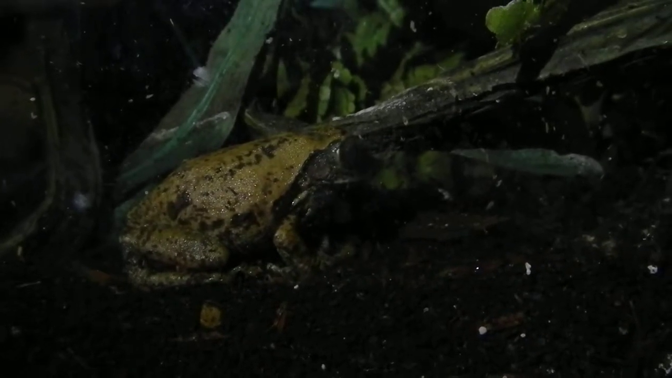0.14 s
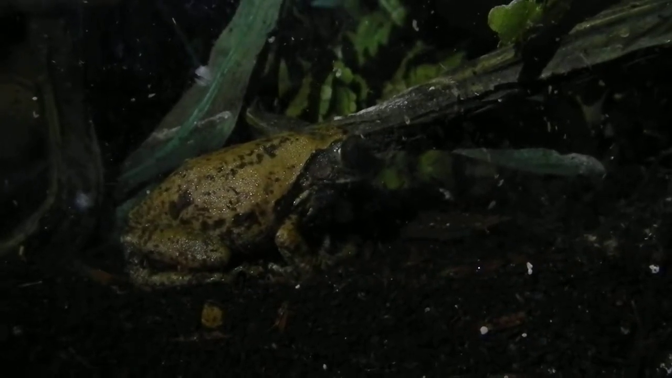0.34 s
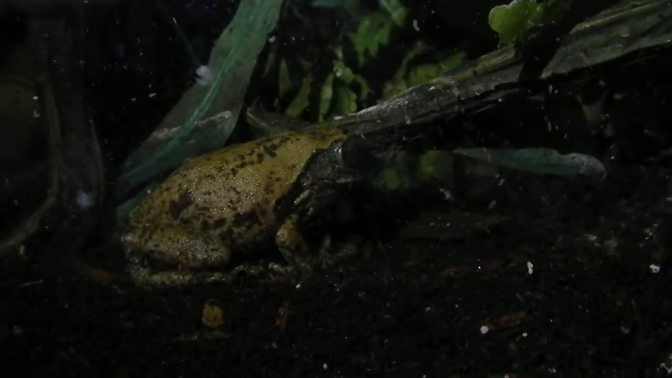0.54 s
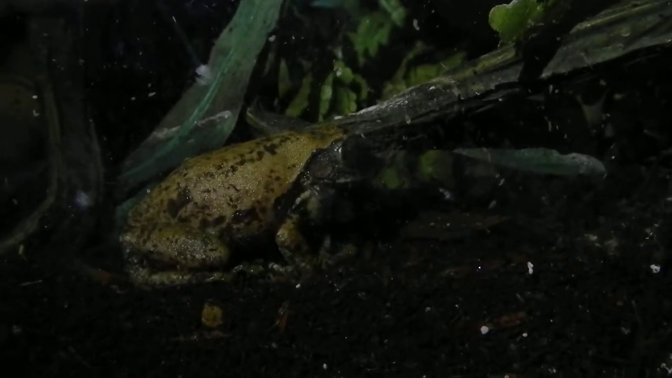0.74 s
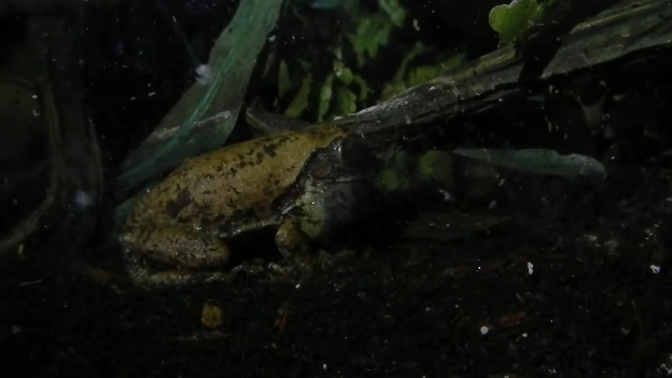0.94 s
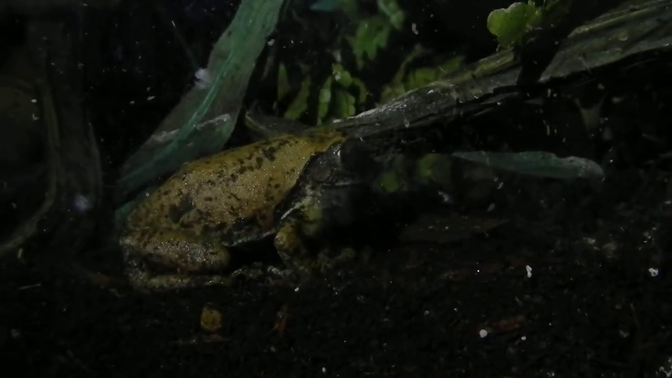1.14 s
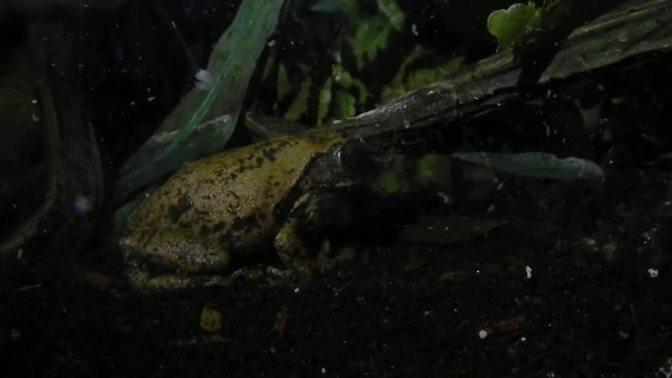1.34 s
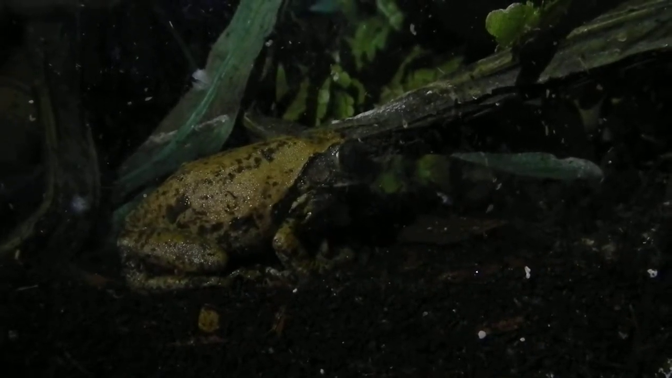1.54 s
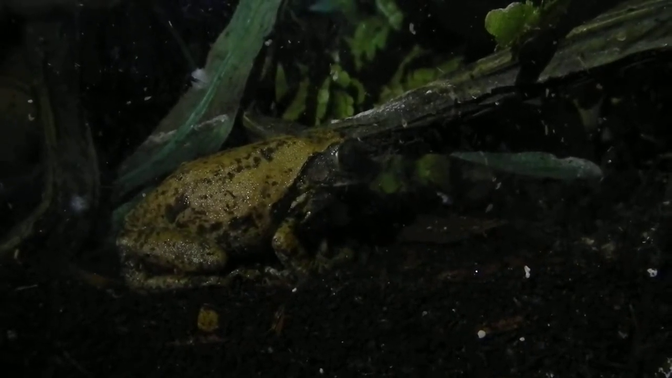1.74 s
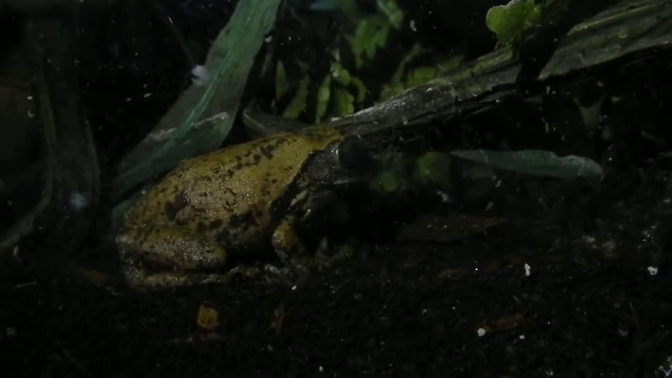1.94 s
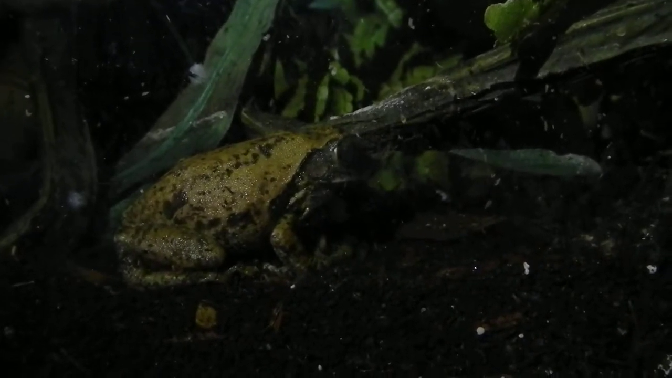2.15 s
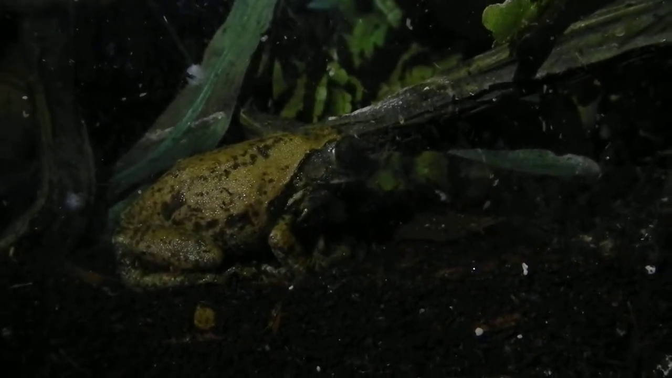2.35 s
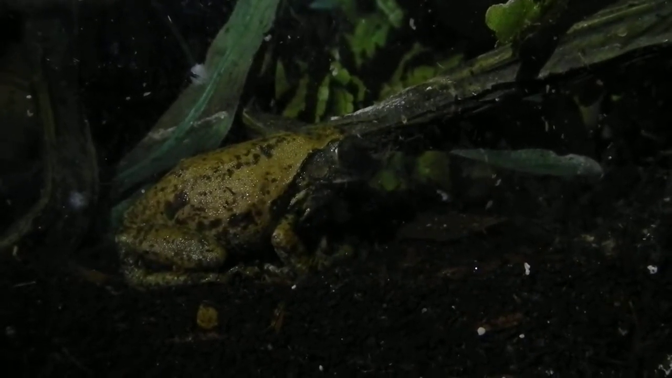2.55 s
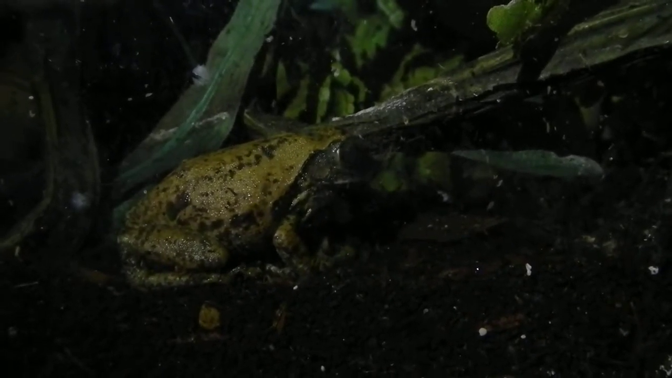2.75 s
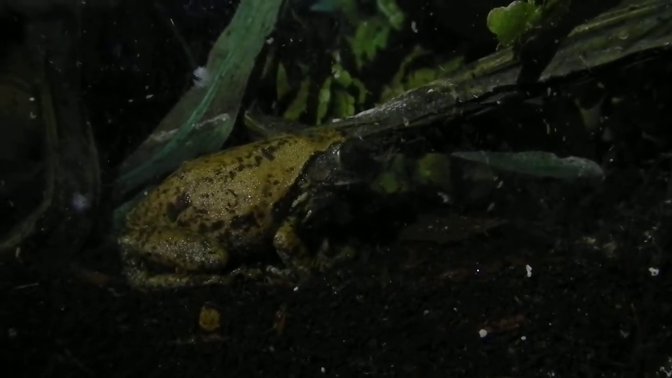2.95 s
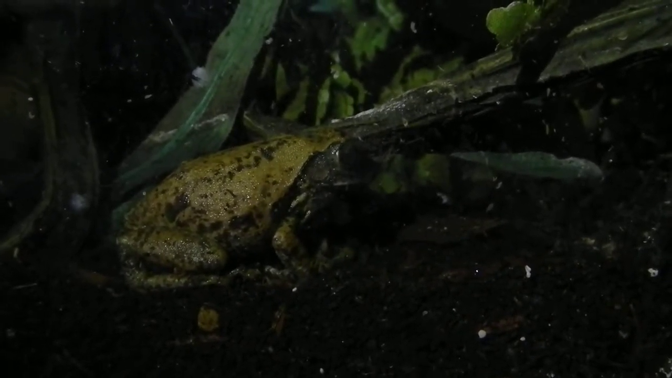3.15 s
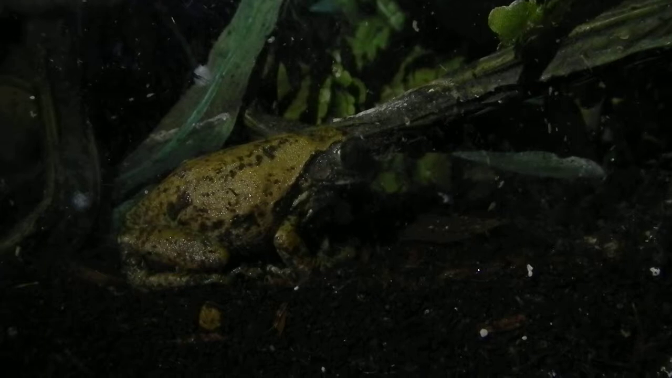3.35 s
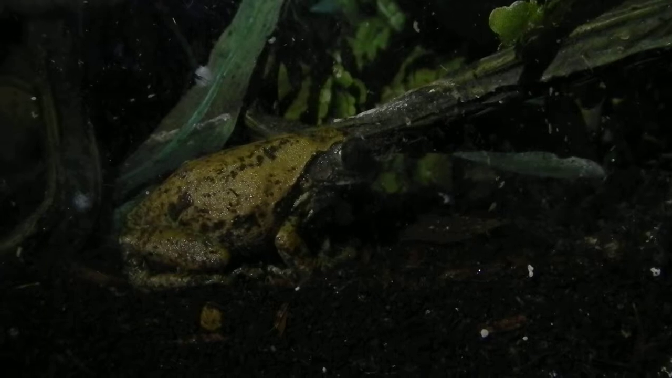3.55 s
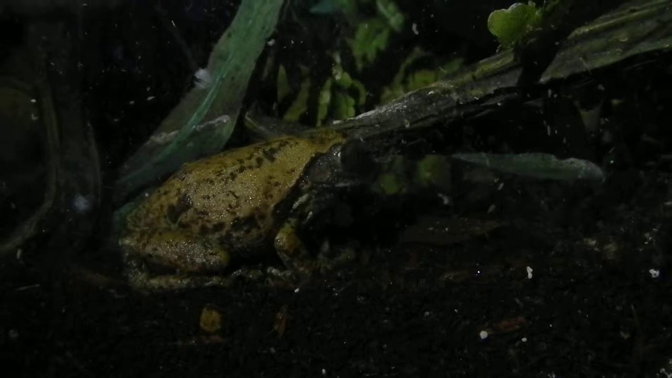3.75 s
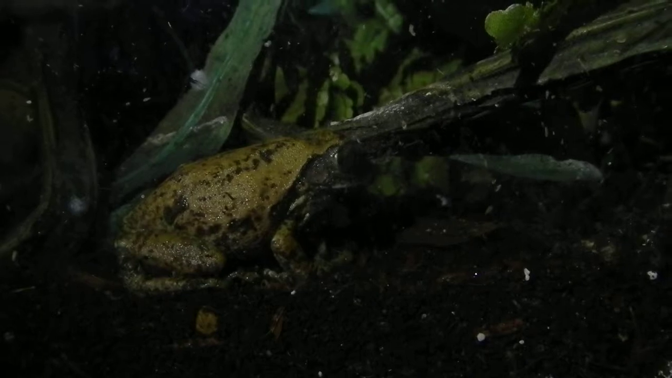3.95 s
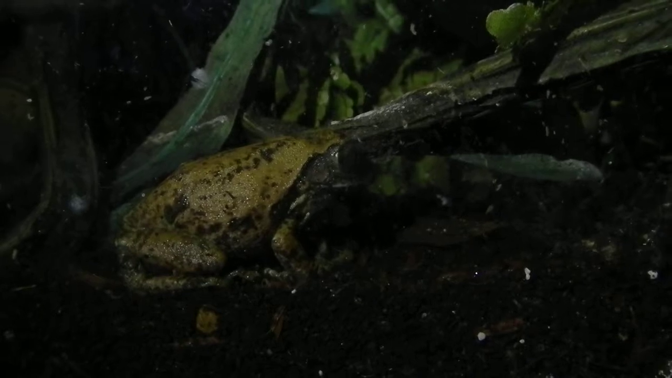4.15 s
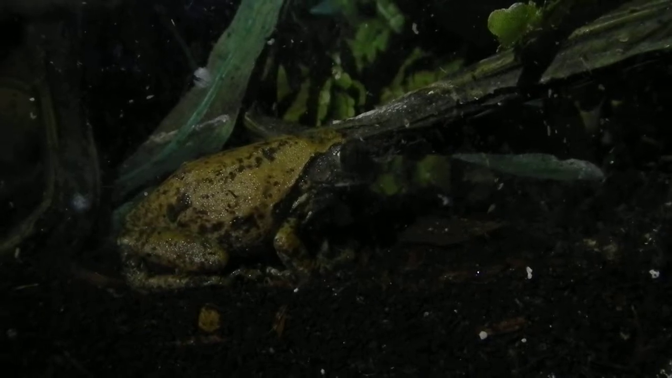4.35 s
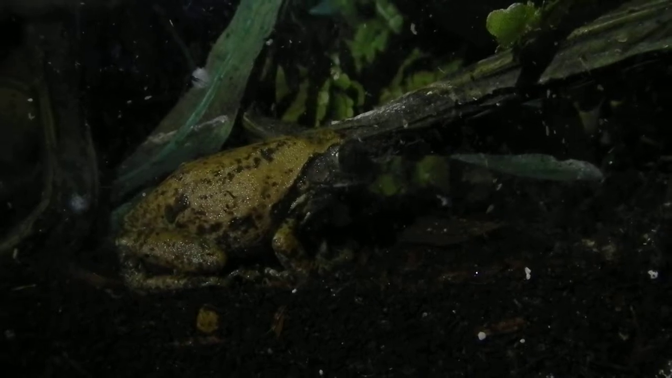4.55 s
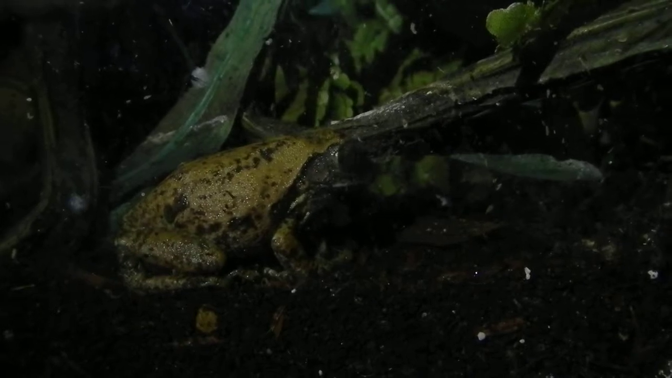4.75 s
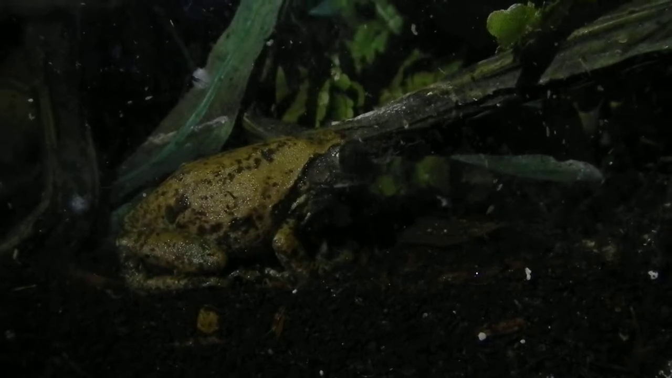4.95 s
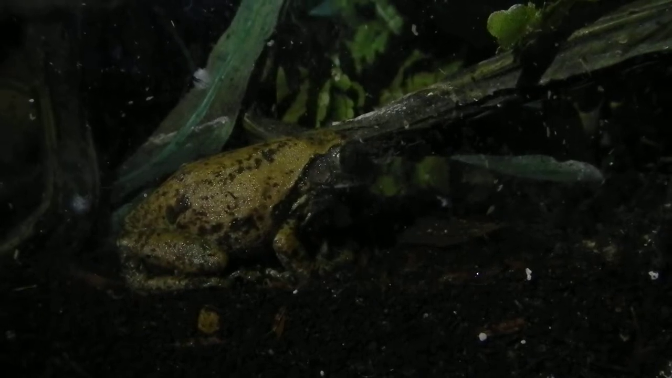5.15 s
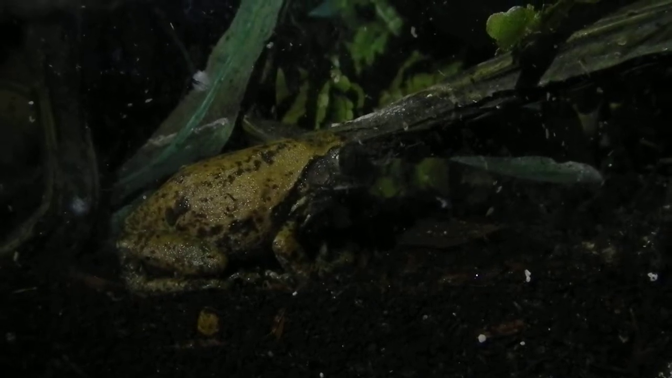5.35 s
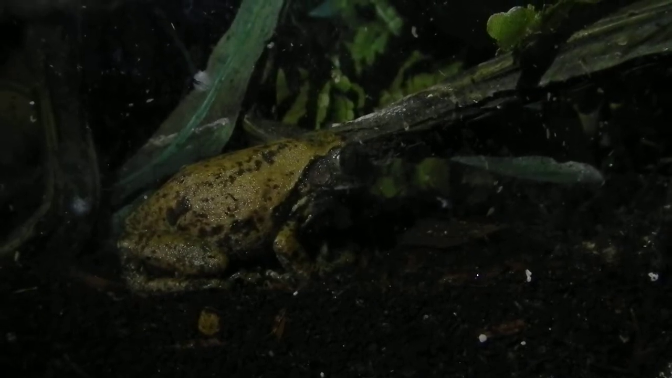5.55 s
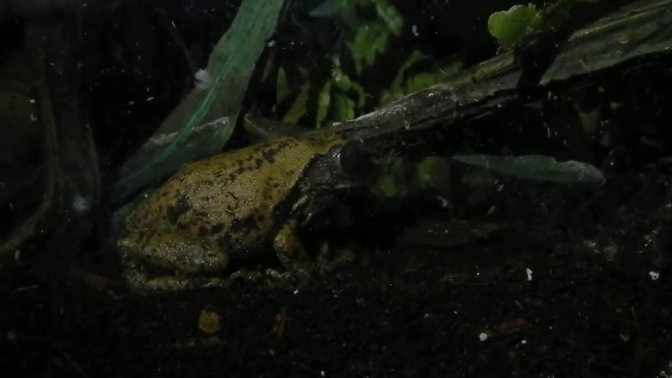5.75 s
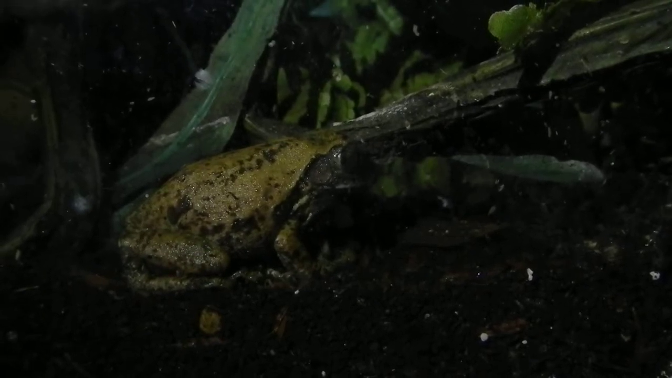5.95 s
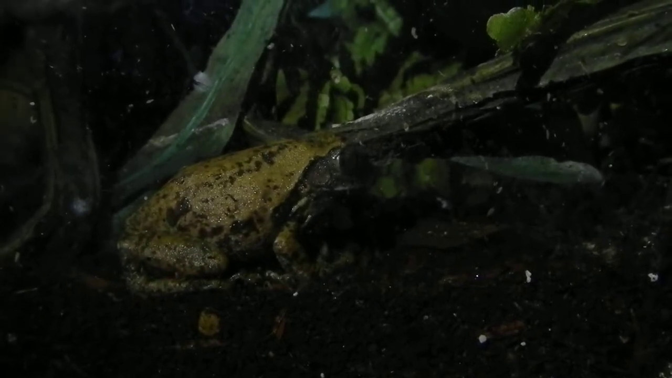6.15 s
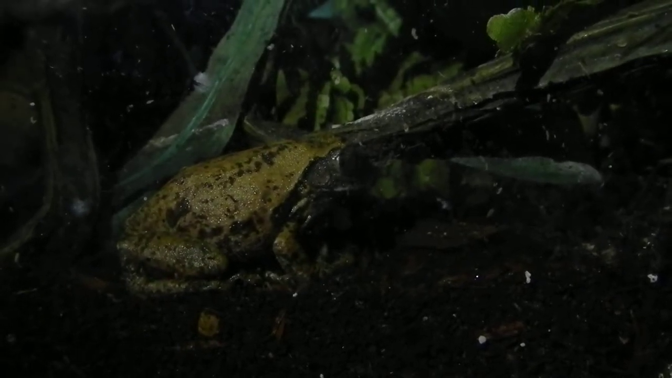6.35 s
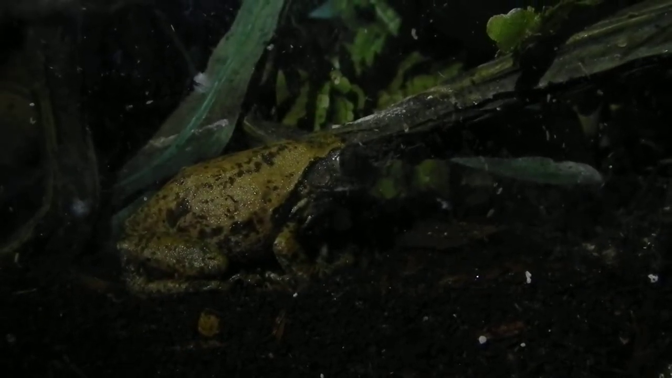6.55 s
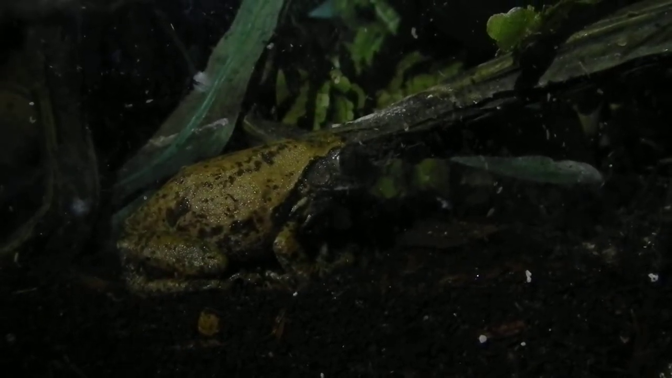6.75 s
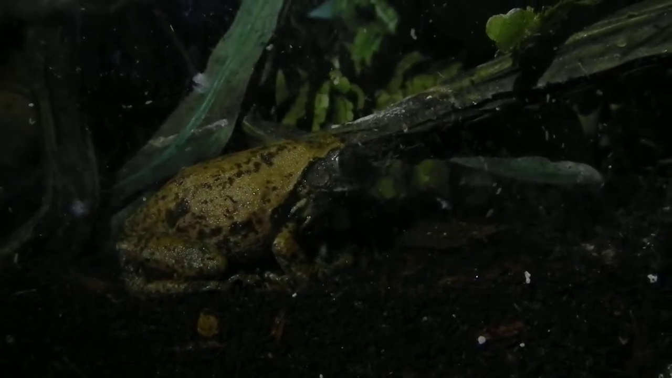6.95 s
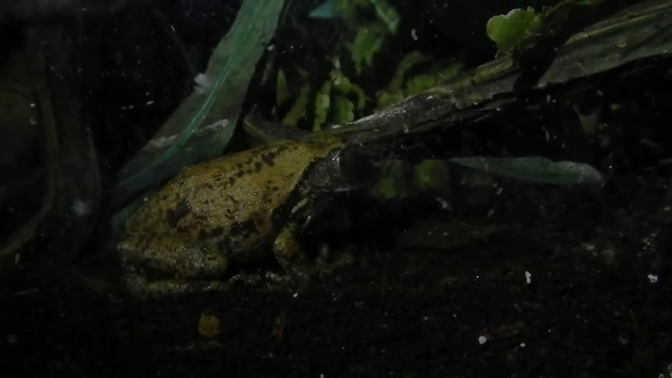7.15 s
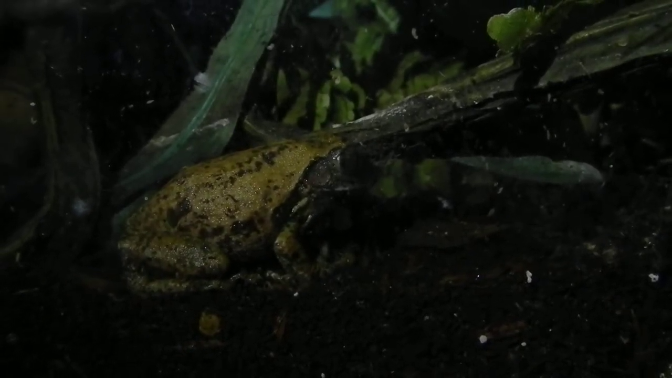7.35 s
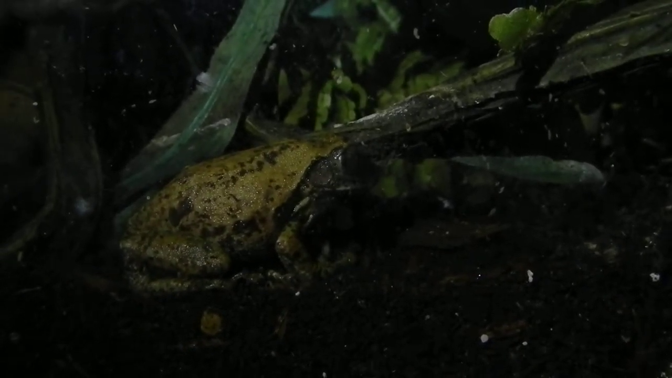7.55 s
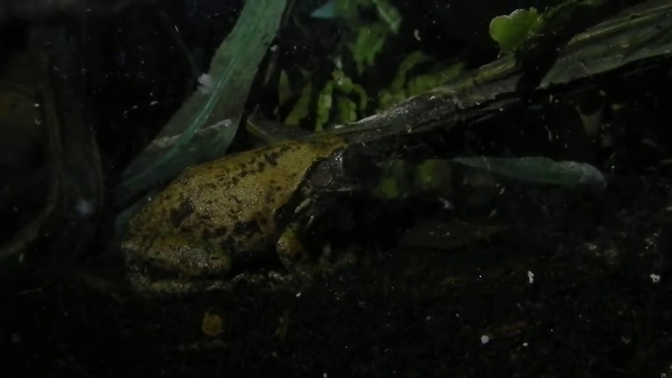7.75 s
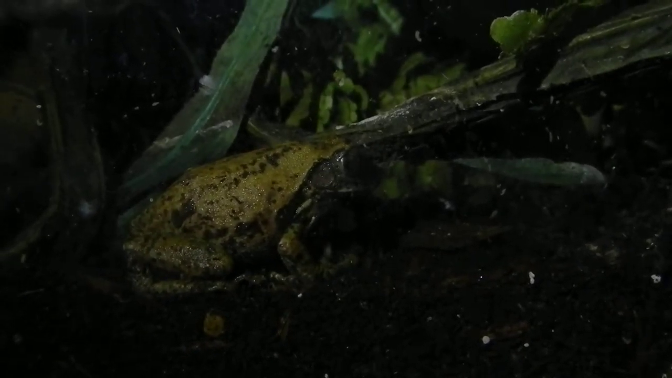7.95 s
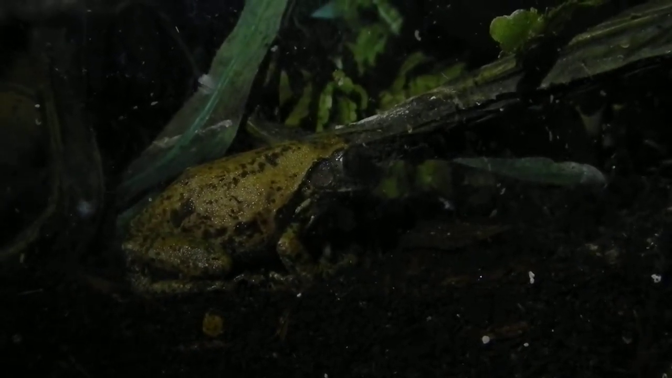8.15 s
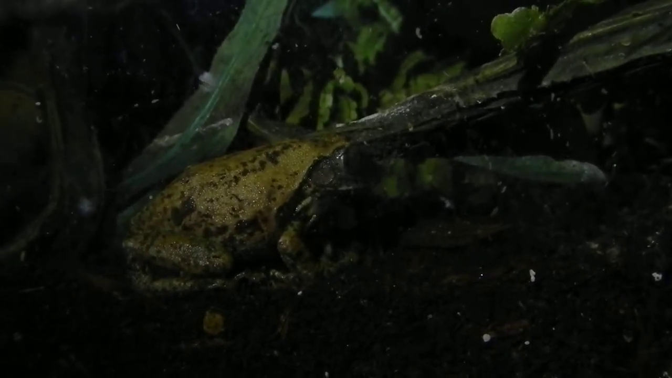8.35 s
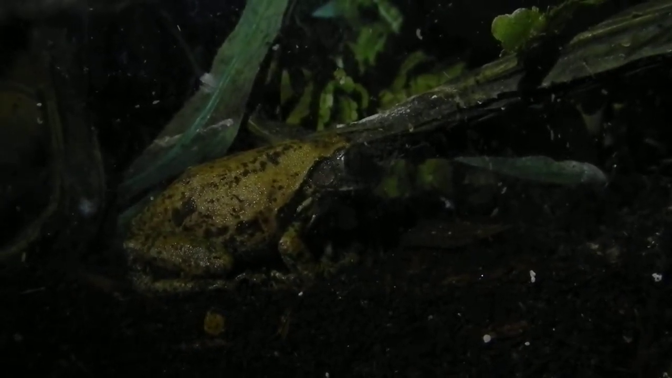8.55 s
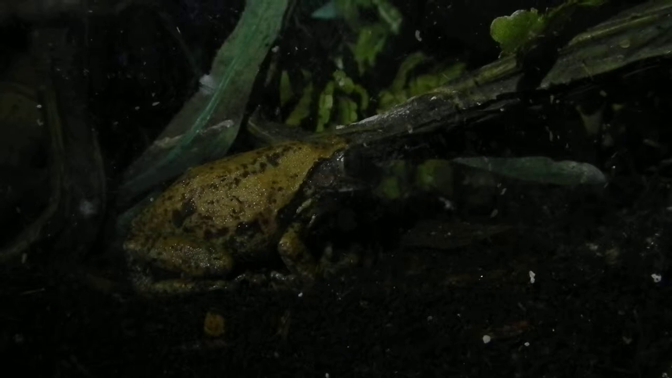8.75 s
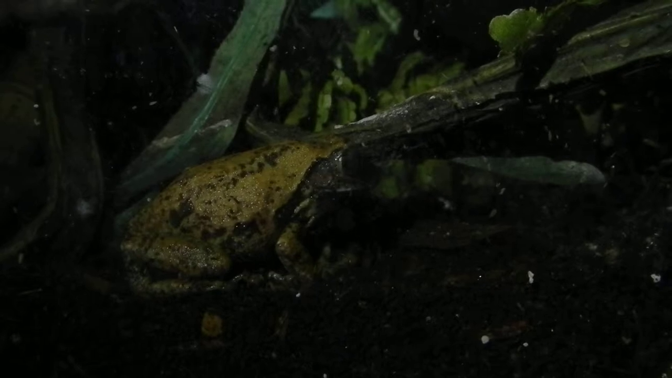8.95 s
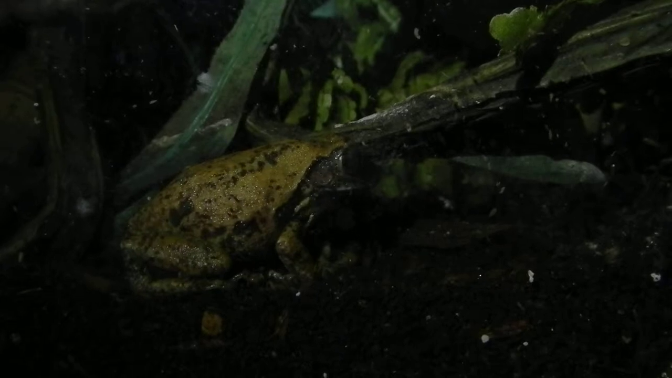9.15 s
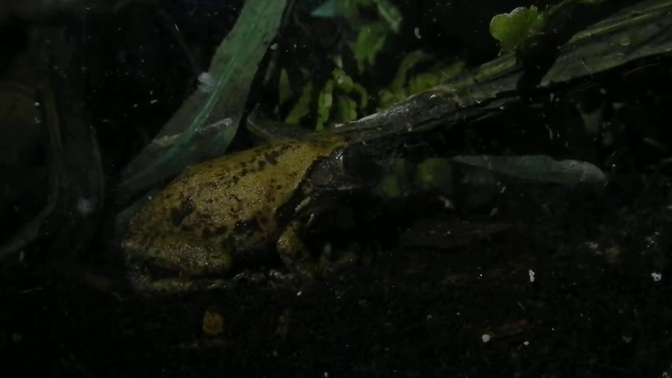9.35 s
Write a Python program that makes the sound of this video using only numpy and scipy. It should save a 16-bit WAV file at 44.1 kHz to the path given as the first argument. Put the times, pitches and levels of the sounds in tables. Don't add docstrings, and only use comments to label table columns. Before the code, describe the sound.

A steady fan hum with rushing air fills an indoor space; one short, rising, whistle-like frog croak sounds about a second in.

```python
import sys
import numpy as np
from scipy import signal
from scipy.fft import rfft, irfft, next_fast_len
from scipy.io import wavfile
from scipy.ndimage import uniform_filter1d, map_coordinates

SR = 44100
rng = np.random.default_rng(int(sys.argv[2]) if len(sys.argv) > 2 else 0)


def decibels_to_gain(level_db):
    exponent = np.asarray(level_db, float) / 20
    return 10 ** exponent


def to_wav(sig):
    pcm = np.clip(np.atleast_2d(sig), -1, 1) * 32767
    pcm = np.round(pcm).astype(np.int16)
    wavfile.write(sys.argv[1], SR, pcm.T)


N = 414099
LEFT_RIGHT = np.array([[1], [-1]])
TOP_HZ = 14250

# start_s, level_db
BLADE_LEVEL = [(0.0, -44), (0.08, -34.5), (0.39, -41), (1.2, -36), (1.93, -40), (2.01, -49), (2.07, -39.5),
               (2.43, -35), (4.03, -37), (4.05, -34.5), (5.83, -33.5), (5.99, -36), (6.61, -31.5),
               (7.32, -38), (7.4, -29), (7.69, -36), (9.39, -34.5)]
# start_s, tone_hz
FAN_SPEED = [
    (0, 464),
    (1.3, 465.5),
    (2.1, 464.3),
    (2.8, 466.6),
    (3.4, 465.8),
    (4.2, 463.3),
    (5.9, 459),
    (7.2, 456.8),
    (9.39, 455.3),
]
# center_hz, width_hz, lift_db
OCTAVE_LIFT = (933, 5.6, 7.1)
# pitch_hz, level_db (per Hz)
AIR_COLOR = [(20, -33), (45, -18.5), (140, -21.5), (380, -18.5), (480, -6.5), (610, -14), (830, -16.5),
             (1000, -17), (1300, -21), (2700, -29), (3000, -33.5), (4300, -36), (4700, -43), (9000, -64)]
# center_hz, width_hz, lift_db
DUCT = [(122.4, 6.7, 5), (219.8, 140, 14.5), (348, 9.3, 6.5), (536, 40, 1), (682, 29, 4.5), (748, 108, 4.5),
        (794, 56, 2), (1165, 63, 3.5), (6100, 500, 4.5)]
# pitch_hz, likeness (1 = same)
AIR_LIKENESS = [(40, 0.33), (130, 0.89), (300, 0.94), (700, 0.95), (1500, 0.82), (3000, 0.82), (6000, 0.49)]
# pitch_hz, left_minus_right_db
AIR_BALANCE = [(40, 1.5), (300, 2), (800, 0.8), (1500, .4), (3000, -0.5), (6000, 2)]
# center_s, half_length_s, level_db
RUSTLES = [
    (4.218, 0.056, -74),
    (7.731, 0.031, -65),
    (7.85, .015, -72),
]
# start_s, pitch_hz
CROAK_PITCH = [
    (.782, 372),
    (.856, 343.75),
    (.873, 344.2),
    (.9, 352.05),
    (.95, 353.5),
    (.978, 359.7),
    (1.02, 362.2),
    (1.16, 362.5),
]
# start_s, level_db
CROAK_EFFORT = [
    (.775, -38.5),
    (.831, -21.3),
    (.866, -7.4),
    (.905, -2.4),
    (.989, -3.5),
    (1.03, -12.7),
    (1.075, -28),
    (1.16, -42),
]
# multiple, level_db (at full effort)
SAC = [(3, -32.8), (4, -20.9), (5, -19.4), (6, -28.6)]
# multiple, level_db (at full effort)
FAINT = [(7, -51), (8, -54), (9, -50.5), (10, -58)]
# center_hz, width_hz, lift_db
TANK = [(1054.7, 29, 11), (1380.7, 22, -17), (1440.7, 7, -11.7), (1726.8, 19, -21.7), (1802, 14, 2.5),
        (2064, 40, 2.4), (2126, 26, 7), (2150.4, 21, -6.5), (2492, 14, 9)]
# center_hz, width_hz, share (signed)
RINGING = [(1058.7, 4, -.37), (1407, 6.2, .7), (1768.4, 6.8, -.24), (1806.4, 7, -.37), (2118.5, 6, -.14)]
# pitch_hz, left_minus_right_db, left_lead_radians
GLASS = [(1060, 0.5, -0.033), (1410, 0.5, -0.14), (1770, 1.5, 0.31), (2120, -2.5, -.12), (2500, -18, .2),
         (3200, 0, 0.43)]
# pitch_hz, time_to_fall_60_db_s
ROOM = [(500, .45), (1500, 1), (4000, 0.27)]
# pitch_hz, level_db (per Hz)
HISS = [(1470, -34), (2500, -3), (4810, -11.5), (5890, -10), (7070, -14.5), (9950, -17), (13100, -20.5),
        (14200, -23)]
# center_hz, width_hz, level_db
COMB = [(10500, 450, -79), (12500, 450, -86), (7900, 350, -82), (10900, 900, -87)]


def unit(x):
    return x / np.sqrt(np.mean(x ** 2) + 1e-20)


def along(points, hz):
    f, v = np.transpose(points)
    return np.interp(np.log(hz + 1), np.log(f + 1), v)


def curves(rows):
    s, *cols = np.transpose(rows)
    return [np.interp(np.arange(N) / SR, s, c) for c in cols]


def wobble(rate):
    points = rng.standard_normal(int(N * rate / SR) + 4)
    return map_coordinates(points, [np.arange(N) * rate / SR])


def filtered(x, response):
    m = next_fast_len(N + 8192)
    return irfft(rfft(x, m) * response(np.fft.rfftfreq(m, 1 / SR)), m)[..., :N]


def turns(hz):
    return 2 * np.pi * np.cumsum(hz + np.zeros(N)) / SR


def resonance_db(table, hz):
    return sum(db / (1 + (2 * (hz - center) / width) ** 2) for center, width, db in table)


def air():
    def color(hz):
        angle = np.arccos(np.clip(along(AIR_LIKENESS, hz), -1, 1)) / 2
        level = decibels_to_gain(along(AIR_COLOR, hz) + resonance_db(DUCT, hz))
        return level * np.array([np.cos(angle), np.sin(angle)])

    mid, side = filtered(rng.standard_normal((2, N)), color)
    pair = np.array([mid + side, mid - side])
    pair = filtered(pair, lambda hz: decibels_to_gain(along(AIR_BALANCE, hz) * LEFT_RIGHT / 2))
    return decibels_to_gain(-38.5 + 3.5 + 0.44 * wobble(2.59)) * unit(pair)


def blades():
    (tone_hz,), (tone_db,) = curves(FAN_SPEED), curves(BLADE_LEVEL)
    tone_hz = uniform_filter1d(tone_hz, size=SR // 2)
    phase = turns(tone_hz) + 0.22 * wobble(12) - .06 * LEFT_RIGHT
    octave_db = -50.5 + 0.35 * (tone_db - tone_db.mean())
    octave_db = octave_db + resonance_db([OCTAVE_LIFT], 2 * tone_hz)
    tone = decibels_to_gain(tone_db + 0.75 * wobble(9) + 0.85 * wobble(2.95)) * np.sin(phase)
    octave = decibels_to_gain(octave_db + 2 * wobble(2.31)) * np.sin(2 * phase)
    return np.sqrt(2) * decibels_to_gain(.8 * LEFT_RIGHT) * (tone + octave)


def rustle():
    time = np.arange(N) / SR
    swell = sum(decibels_to_gain(db) * np.exp(-((time - s) / half) ** 2) for s, half, db in RUSTLES)
    noise = filtered(rng.standard_normal(N), lambda hz: np.exp(-((hz - 10200) / 1500) ** 2))
    return swell * unit(noise)


def room(x):
    hz, t, z = signal.stft(rng.standard_normal((2, SR // 2)), SR, nperseg=256)
    fade = decibels_to_gain(-60 * t / along(ROOM, hz)[:, None])
    tail = signal.istft(z * fade, SR, nperseg=256)[1]
    tail = np.array([tail[0] + 0.44 * tail[1], tail[0] - .6 * tail[1]])
    tail = tail / np.linalg.norm(tail[0])
    delayed = np.pad(x, (300, 0))[None]
    return signal.fftconvolve(delayed, tail, axes=1)[:, :N]


def ringing(call):
    def response(hz):
        modes = [share * 1j * hz * width / (center * center - hz * hz + 1j * hz * width)
                 for center, width, share in RINGING]
        return 1 + sum(modes)

    return filtered(call, response)


def through_glass(call):
    f, left_db, lead = np.transpose(GLASS)
    half = LEFT_RIGHT / 2

    def response(hz):
        balance = decibels_to_gain(half * np.interp(hz, f, left_db))
        return balance * np.exp(1j * half * np.interp(hz, f, lead))

    return filtered(call, response)


def frog(sweep):
    (pitch_hz,), (effort_db,) = curves(CROAK_PITCH), curves(CROAK_EFFORT)
    phase = turns(pitch_hz)
    time = np.arange(N) / SR
    sounding = (time > CROAK_EFFORT[0][0]) & (time < CROAK_EFFORT[-1][0])
    overtones = []
    for k, db in SAC:
        overtones.append((k, effort_db + db + resonance_db(TANK, k * pitch_hz)))
    for k, db in FAINT:
        level_db = 2.1 * effort_db + db + resonance_db(TANK, k * pitch_hz)
        overtones.append((k, level_db + 5 * wobble(45.9)))
    ragged_db = .3 - .05 * np.maximum(effort_db, -20)
    call = 0
    for k, level_db in overtones:
        call = call + decibels_to_gain(level_db + ragged_db * wobble(60.2)) * np.sin(k * phase + sweep * k * k)
    return -np.sqrt(2) * sounding * call


def scene():
    call = frog(sweep=.8)
    echo = decibels_to_gain(-27) * room(call)
    return air() + blades() + rustle() + echo + through_glass(ringing(call))


def hiss():
    def color(hz):
        passed = (hz < TOP_HZ) + decibels_to_gain(8) * (hz > 14930) * (hz < 15160)
        return decibels_to_gain(along(HISS, hz)) * passed

    noise = decibels_to_gain(-55.5) * unit(filtered(rng.standard_normal((2, N)), color))
    return noise * decibels_to_gain(0.31 * wobble(7) + 0.36 * wobble(16))


def clock_comb(clock_hz):
    hz = clock_hz * np.arange(36, 71)[:, None]
    cycle = np.arange(round(SR / clock_hz * 2)) / SR
    humps = np.array([decibels_to_gain(db) * np.exp(-((hz - center) / width) ** 2) for center, width, db in COMB])
    humps = humps.reshape(2, 2, -1, 1).sum(axis=1)
    uneven = decibels_to_gain(rng.normal(0, 2.9, humps.shape))
    lines = humps * uneven * np.sin(2 * np.pi * (hz * cycle + rng.random(humps.shape)))
    return np.array([np.resize(side, N) for side in lines.sum(axis=1)])


def whine(whine_hz):
    phase = turns(whine_hz) + .4 * wobble(8) + .11 * LEFT_RIGHT
    phase = phase + .3 * np.array([wobble(14), wobble(14)])
    waver_db = .9 * wobble(5) + 1.3 * wobble(45) + 1.1 * np.array([wobble(16), wobble(16)])
    return decibels_to_gain(-61.5 + waver_db) * decibels_to_gain(1.2 * LEFT_RIGHT) * np.sin(phase)


def low_pass(x):
    return signal.sosfilt(signal.butter(12, 15610, fs=SR, output="sos"), x)


def record(dry):
    limited = filtered(dry, lambda hz: hz < TOP_HZ)
    mix = limited + hiss() + clock_comb(clock_hz=200) + whine(whine_hz=14835.3)
    return low_pass(mix)


dry = scene()
out = record(dry)
to_wav(out)
```